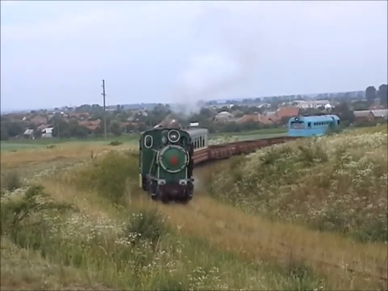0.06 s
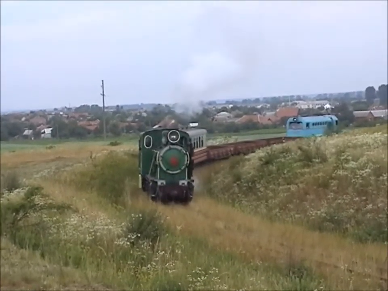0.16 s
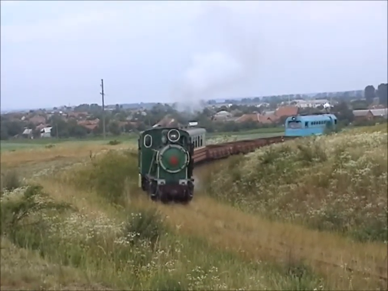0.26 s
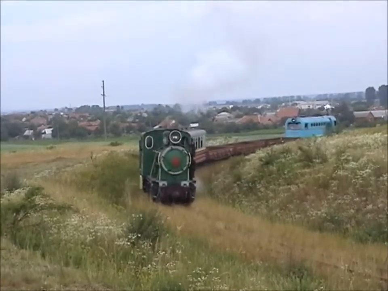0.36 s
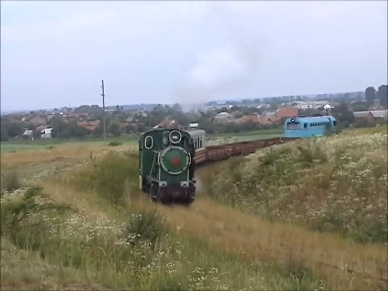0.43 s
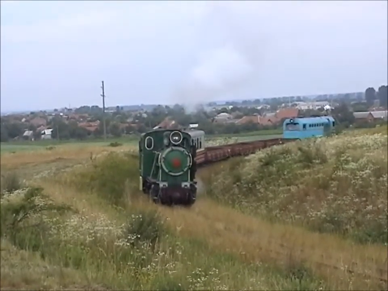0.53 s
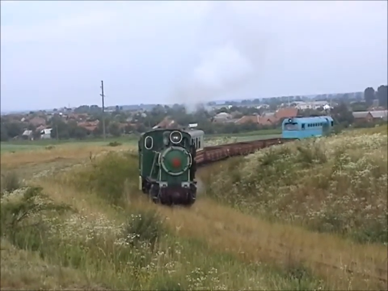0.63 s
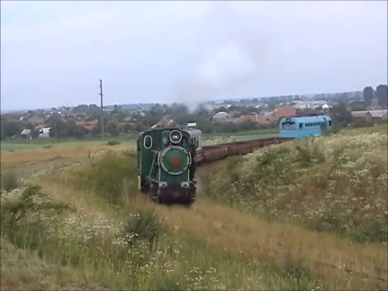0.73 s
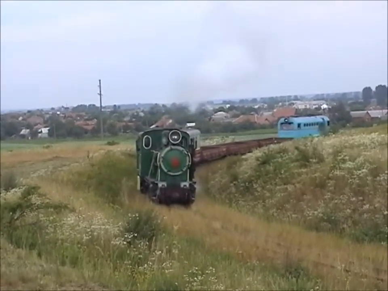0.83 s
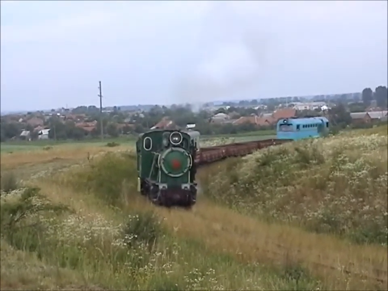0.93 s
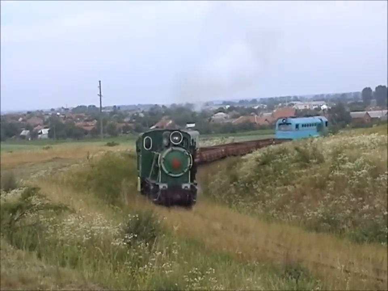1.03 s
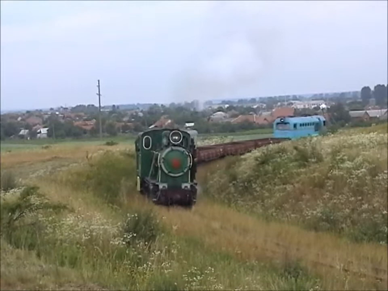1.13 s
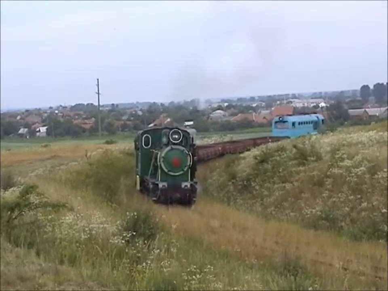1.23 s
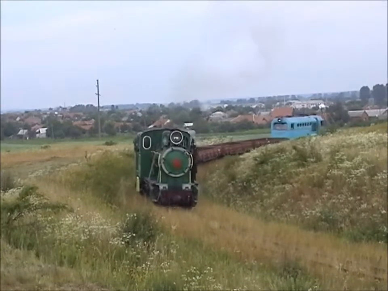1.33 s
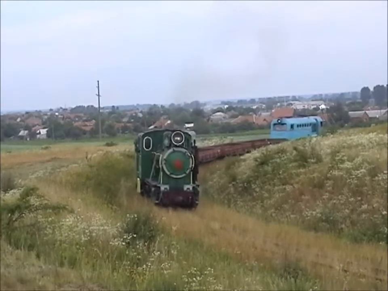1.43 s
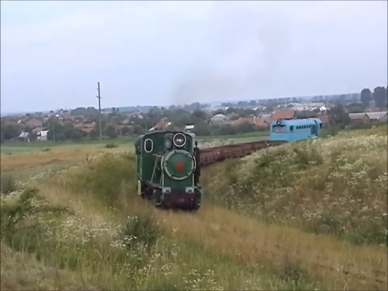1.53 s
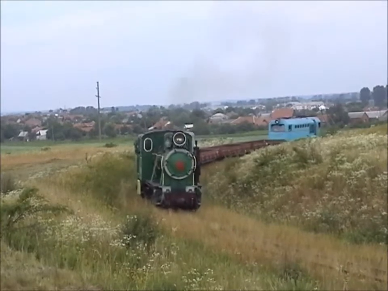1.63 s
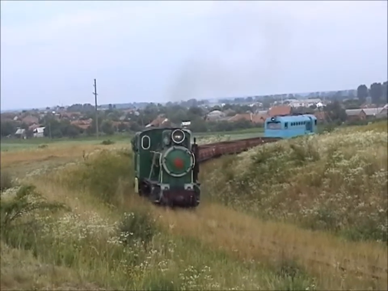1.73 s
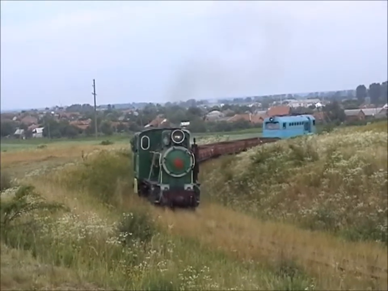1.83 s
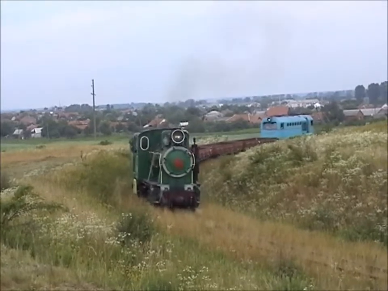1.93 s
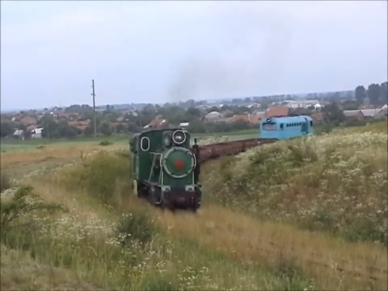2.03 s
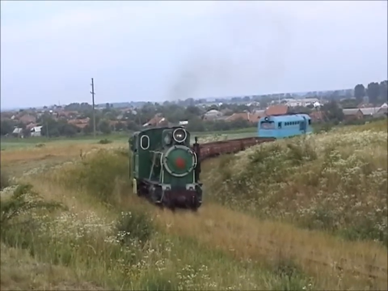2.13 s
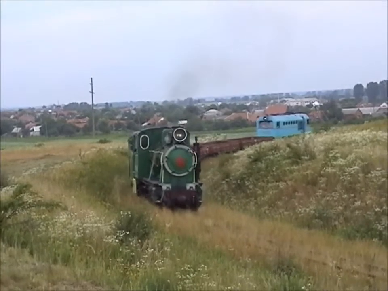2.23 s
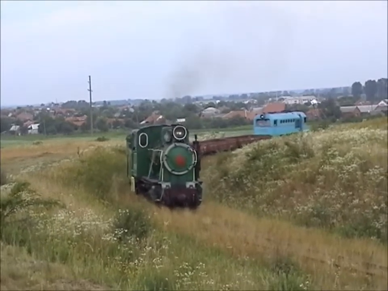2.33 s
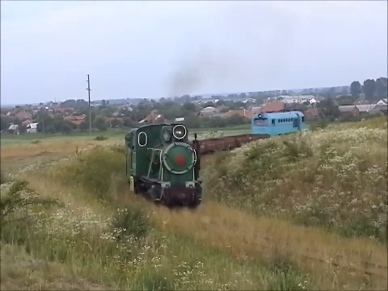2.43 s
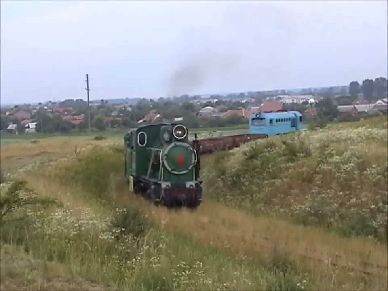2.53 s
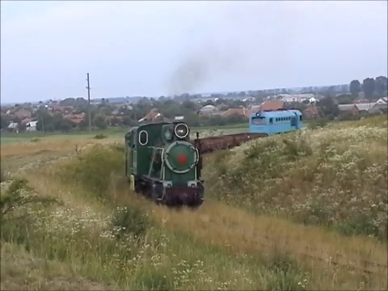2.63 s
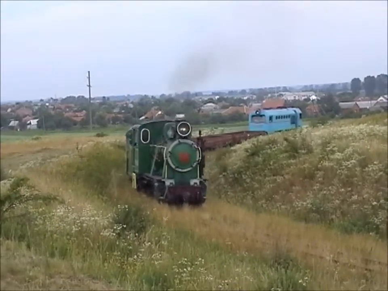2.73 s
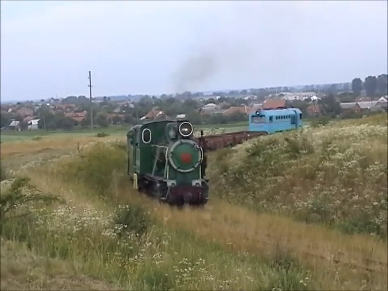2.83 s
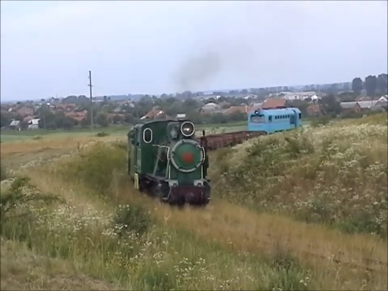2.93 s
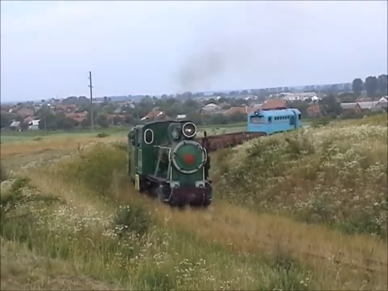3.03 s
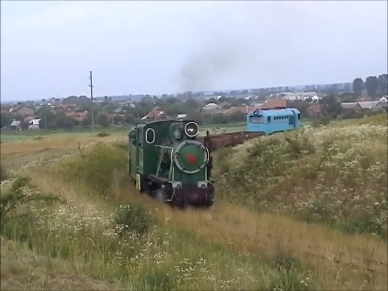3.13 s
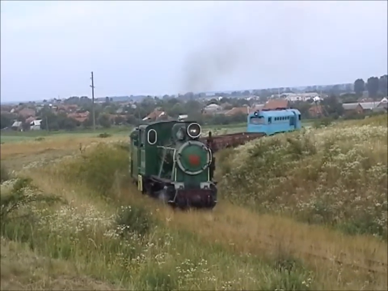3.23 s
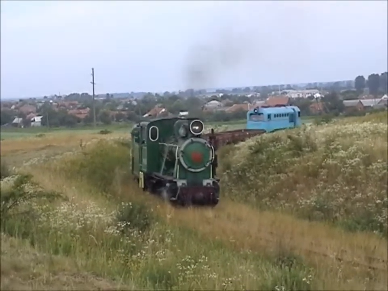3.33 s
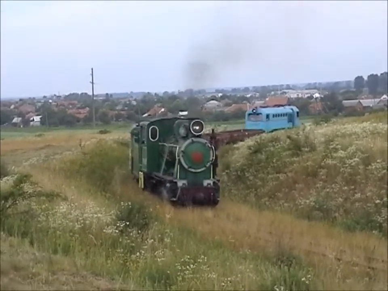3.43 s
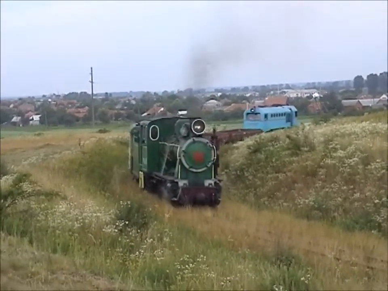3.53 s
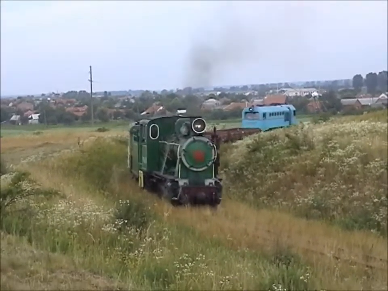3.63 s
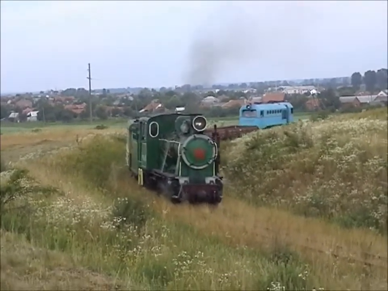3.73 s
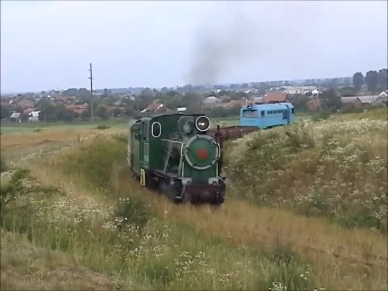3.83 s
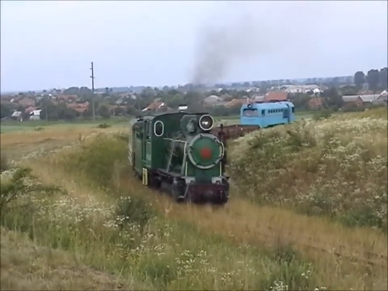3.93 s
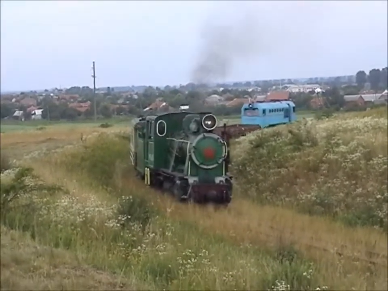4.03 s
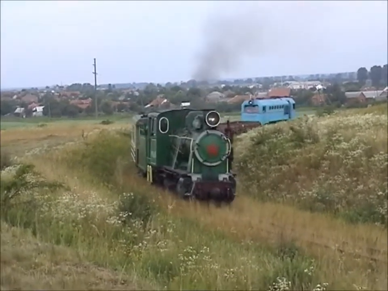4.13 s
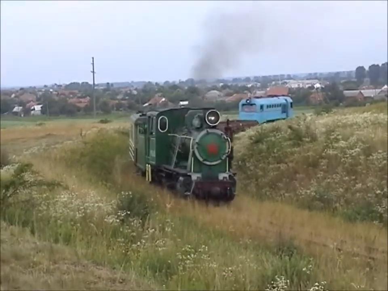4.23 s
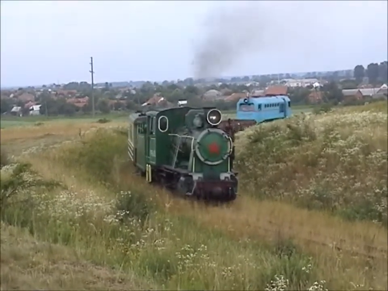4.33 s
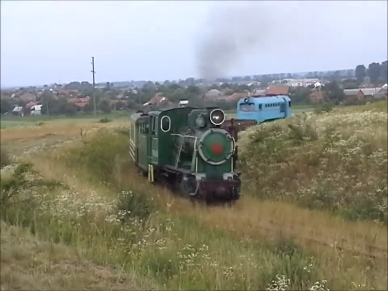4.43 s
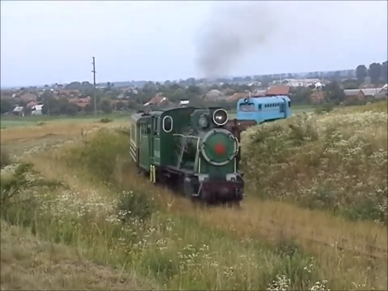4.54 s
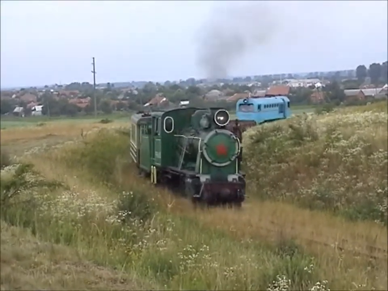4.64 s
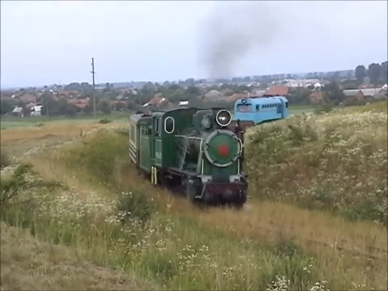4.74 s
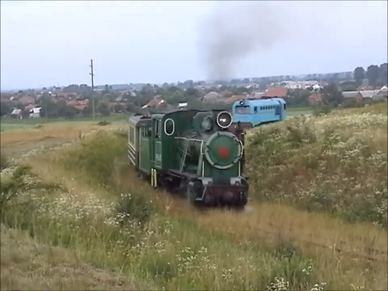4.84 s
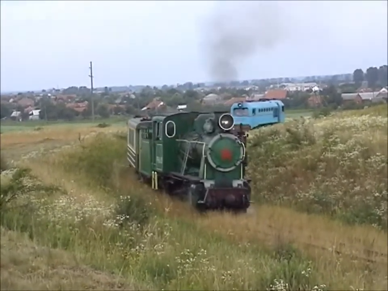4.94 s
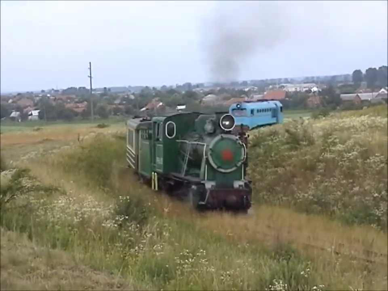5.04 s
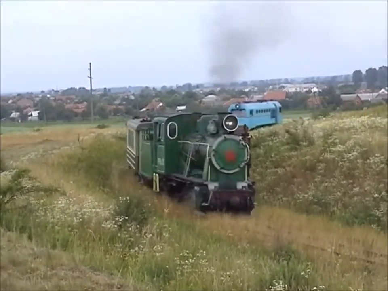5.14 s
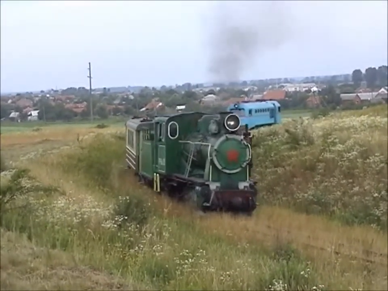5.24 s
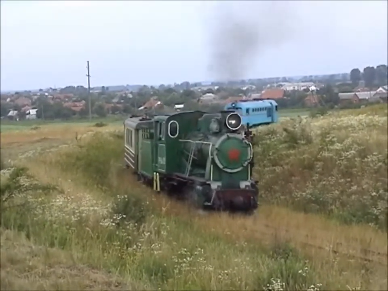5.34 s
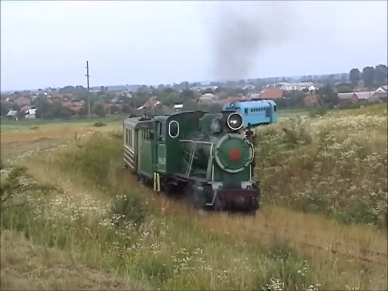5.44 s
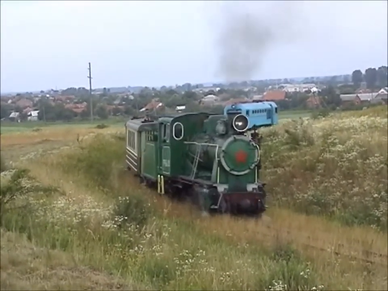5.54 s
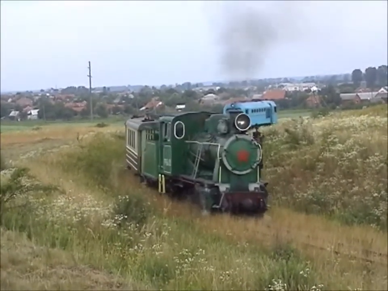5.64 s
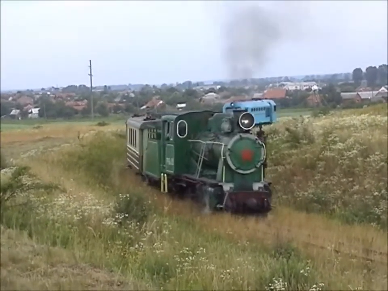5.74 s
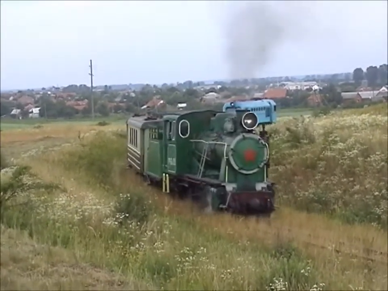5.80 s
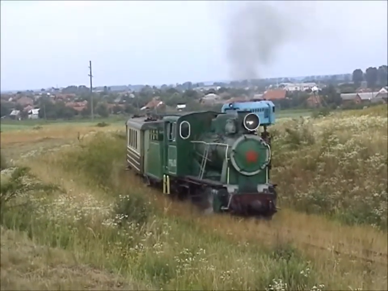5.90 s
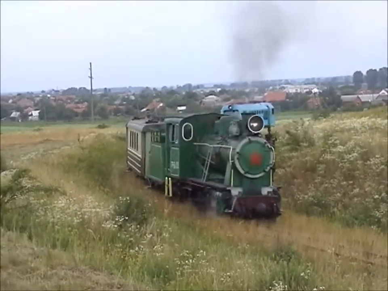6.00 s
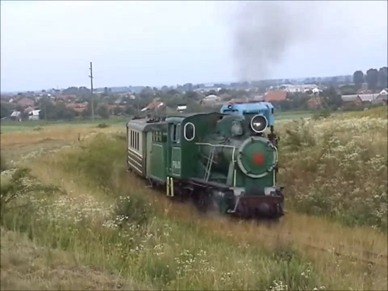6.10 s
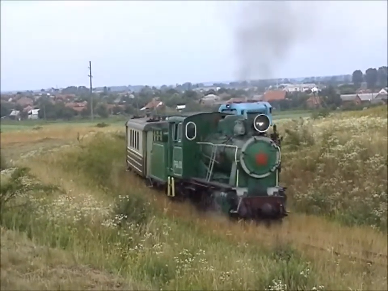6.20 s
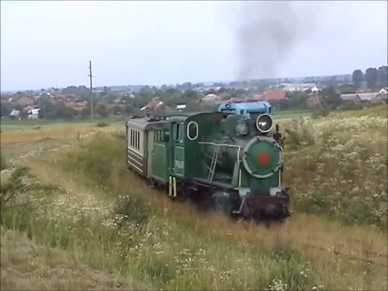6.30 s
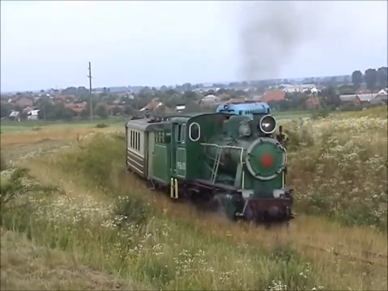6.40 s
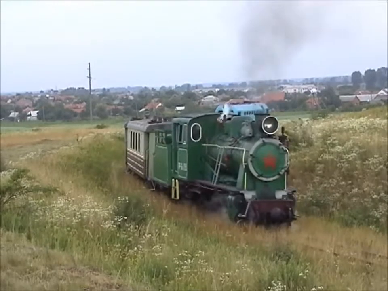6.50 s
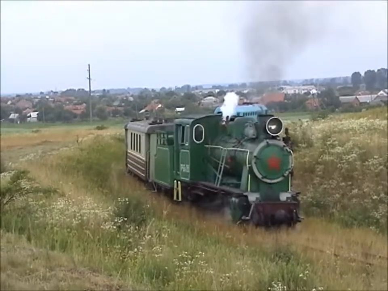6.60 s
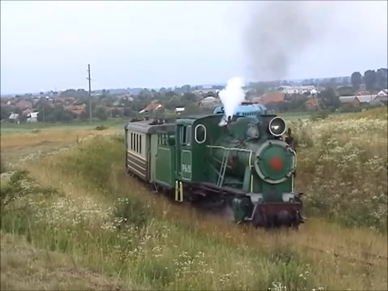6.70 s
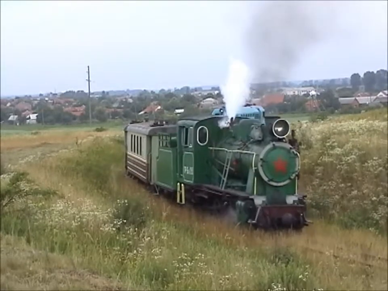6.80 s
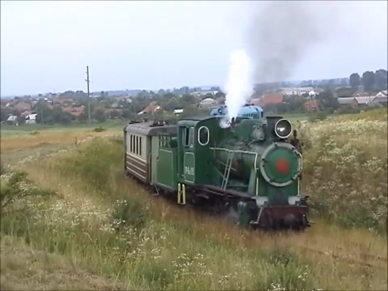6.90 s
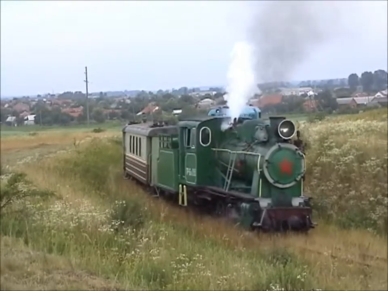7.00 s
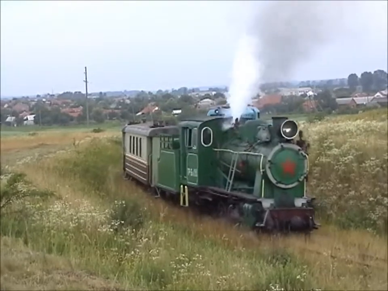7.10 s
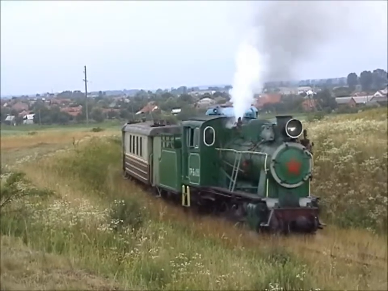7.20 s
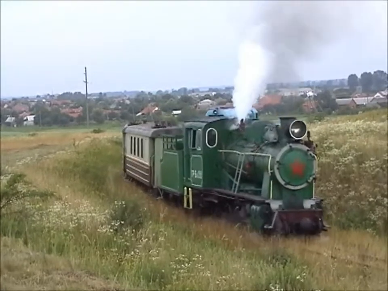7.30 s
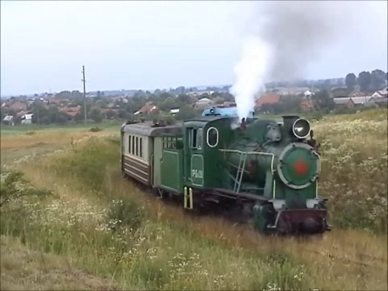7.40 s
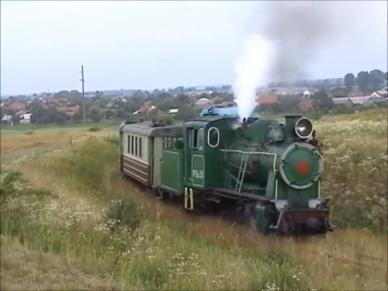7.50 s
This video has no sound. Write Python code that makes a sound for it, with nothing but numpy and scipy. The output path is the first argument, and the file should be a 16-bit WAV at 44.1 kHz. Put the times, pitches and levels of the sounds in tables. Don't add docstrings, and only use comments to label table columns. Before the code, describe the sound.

Outdoors in an open grassy field, a small steam engine slowly approaches. Bright cylinder hisses swell and snap off about once every 0.9 seconds, answered by hollower, ringing hisses. Soft low chuffs thud about four or five a second over a quiet rumble of wheels and wagons. Near the end a whistle bursts in with a wet sputter, slides upward and holds loudly, pushing the rest down. Handheld stereo microphone at some distance.

```python
import sys
import numpy as np
from scipy import signal
from scipy.fft import rfft, irfft, next_fast_len
from scipy.io import wavfile
from scipy.ndimage import uniform_filter1d, map_coordinates

SR = 44100
rng = np.random.default_rng(int(sys.argv[2]) if len(sys.argv) > 2 else 0)


def log_audio(samples):
    frames = np.atleast_2d(samples).T
    limited = np.clip(frames, -1, 1)
    pcm = np.round(limited * 32767).astype(np.int16)
    wavfile.write(sys.argv[1], SR, pcm)


def level_to_linear(level):
    exponent = np.asarray(level, float) / 20
    return 10 ** exponent


N = 333396
T = np.arange(N) / SR
M = 2 * next_fast_len(N // 2 + 2048, real=True)
F = np.maximum(np.arange(M // 2 + 1) * SR / M, 1)

# (frequency [Hz], width [Hz], level [dB])
WHISTLE_DIP = [(1430, 200, -24)]


def unit(x):
    return x / np.sqrt(np.mean(x ** 2))


def along(points):
    hz, value = np.transpose(points)
    return np.interp(np.log(F), np.log(hz), value)


def played(table, hold=False):
    s, *columns = np.transpose(table)
    gate = np.clip(np.minimum(T - s[0], s[-1] + hold - T) / 0.01 + 1, 0, 1)
    return [np.interp(T, s, c) for c in columns] + [gate]


def bumps(peaks):
    return level_to_linear(sum(db * np.exp(-2 * ((F - hz) / width) ** 2) for hz, width, db in peaks))


def resonances(peaks, steep=2):
    power = sum(level_to_linear(2 * db) / (1 + ((F - hz * hz / F) / width) ** 2) ** steep for hz, width, db in peaks)
    return np.sqrt(power)


def shaped(x, gain):
    return irfft(rfft(x, M) * gain, M)[..., :N]


def walk(rate):
    k = max(int(SR / rate), 1)
    steps = np.repeat(rng.standard_normal(N // 8 + 1)[:N // k + 1], k)
    return unit(uniform_filter1d(uniform_filter1d(steps, k), k)[:N])


def turbulence(gain, sputter_db, flicker_db, flicker_rate, count=3):
    jet = shaped(rng.standard_normal(N) * level_to_linear(sputter_db * walk(700)), gain)
    hz, s, cells = signal.stft(jet, SR, nperseg=512)
    band = count * np.log2(np.maximum(hz, 32) / 32)
    place = np.meshgrid(band, s * flicker_rate, indexing="ij")
    flutter = map_coordinates(rng.standard_normal((10 * count, 400)), place, order=1)
    cells = cells * level_to_linear(1.5 * flicker_db * flutter)
    return unit(signal.istft(cells, SR, nperseg=512)[1][:N])


def strokes():
    # (opens [s], rise [s], peak [dB], snaps shut [s], seep after it [dB])
    thin_jets = [
        (-0.38, 0.05, -18, 0.3, -42.5),
        (0.52, 0.14, -18, 1.2, -40.5),
        (1.42, 0.17, -18, 2.116, -40.5),
        (2.31, 0.18, -16, 3.094, -39.5),
        (3.22, 0.2, -16, 3.886, -38.5),
        (4.119, 0.13, -15.5, 4.785, -37),
        (4.986, 0.1, -14.5, 5.64, -35.5),
        (5.861, 0.1, -15.5, 6.49, -31.5),
    ]
    # (opens [s], peak [dB], shuts [s], second resonance [dB], pressure taken from the thin jet [dB])
    hollow_jets = [
        (-0.06, -19, 0.15, -4, -4),
        (0.8, -18, 1.06, -4.5, 1),
        (1.69, -19.5, 2.013, -0.5, -2.5),
        (2.62, -18, 2.9, 0, -6),
        (3.51, -17, 3.81, -2, -3.5),
        (4.4, -18.5, 4.727, -4, -0.5),
        (5.28, -18.5, 5.64, -7, -1.5),
        (6.15, -16.5, 6.46, -6, 0.5),
    ]
    burst_share, burst_db = 0.44, -5.5
    settle_s, settle_db, sag_db_per_s = 0.11, -2.5, 13.5
    taper_s, taper_db = 0.096, -4.5
    close_s, creep_db = 0.03, 5
    steal_s = 0.073
    brighten_s, dull_lag_s, dull_s = 0.017, 0.028, 0.091
    seep_bright = 0.45
    late_bright, bright_per_db = 0.22, 0.08
    hollow_rise_s, hollow_sag_db, hollow_close_s, hollow_shut_db = 0.066, -1.5, 0.19, -20.5

    thin, bright, hollow, seep = [], [], [], -40
    for (s, rise, db, shut, rest), (back, peak, end, second, taken) in zip(thin_jets, hollow_jets):
        top = s + rise
        stolen = back + steal_s
        dulls = back + dull_lag_s

        def sagged(t):
            return t, db + settle_db - sag_db_per_s * (t - top - settle_s) + taken * (t > stolen)

        thin += [(s, seep + creep_db), (s + burst_share * rise, db + burst_db), (top, db),
                 (top + settle_s, db + settle_db), sagged(stolen), sagged(stolen + dull_s),
                 sagged(shut - taper_s), (shut, sagged(shut)[1] + taper_db), (shut + close_s, rest)]
        bright += [(s, seep_bright), (s + burst_share * rise, 0), (top + brighten_s, 1),
                   (dulls, 1), (dulls + dull_s, 0),
                   (shut, late_bright - bright_per_db * taken), (shut + close_s, seep_bright)]
        hollow += [(back, peak + hollow_shut_db, second), (back + hollow_rise_s, peak, second),
                   (end, peak + hollow_sag_db, second),
                   (end + hollow_close_s, peak + hollow_shut_db, second)]
        seep = rest
    return played(thin)[0], played(bright)[0], *played(hollow)[:2]


def leaks():
    # (frequency [Hz], level [dB per Hz])
    thin_colour = [(760, -42), (1300, -18.5), (2200, -6), (3500, -2.5), (5200, -1), (7400, 0), (8500, -5.5),
                   (10000, -7), (11500, -15.5), (12500, -20), (15700, -24)]
    # (frequency [Hz], width [Hz], boost [dB])
    drain_pipe = [(2250, 200, 2.5), (2770, 250, 3), (3150, 300, -4), (3850, 400, 2.5), (4220, 200, -4),
                  (4750, 300, -3), (5200, 400, 3), (5700, 250, -2.5), (6050, 300, 2.5), (6500, 300, -4),
                  (7550, 300, 3), (8170, 450, -6), (8900, 450, 5), (9550, 450, -4), (10050, 400, 3),
                  (10750, 350, -4), (11200, 350, 3.5)]
    # (frequency [Hz], width [Hz], level [dB])
    hollow_low = [(1297, 210, -13.5), (1717, 98, 2), (1907, 380, 0.5), (2228, 126, 2.5)]
    hollow_high = [(3586, 440, 1), (4185, 470, 1.5), (6300, 1500, -7)]
    dull_top_db, bright_top_db, dull_body_db, bright_body_db = -12, -8, 2.5, -0.5
    nearing_db_per_s = 0.5
    drown_s = 6.62

    thin_db, bright, hollow_db, second_db = strokes()
    hollow_db = uniform_filter1d(hollow_db, int(0.07 * SR))
    top_db = dull_top_db + (bright_top_db - dull_top_db) * bright
    body_db = dull_body_db + (bright_body_db - dull_body_db) * bright
    body_db = body_db + nearing_db_per_s * (T - T.mean())

    jet = turbulence(level_to_linear(along(thin_colour)) * bumps(drain_pipe) ** 0.16,
                     sputter_db=0.5, flicker_db=1.9, flicker_rate=9, count=8)
    blast = np.clip((thin_db + top_db + 38) / 10, 0, 1)
    jet = jet + blast * (shaped(jet, bumps(drain_pipe) ** 0.7) - jet)

    above = 1 / (1 + (8200 / F) ** 14)
    below = 1 / (1 + (F / 4700) ** 16)
    early_db = 0.92 * np.clip(np.interp(T + 0.021, T, thin_db) - thin_db - 1.0, 0, 12)
    hiss = shaped(jet, 1 - above - below)
    body = level_to_linear(body_db - 0.5 + early_db) * shaped(jet, below)
    thin = level_to_linear(3.0) * (hiss + body) + level_to_linear(top_db) * unit(shaped(jet, above))

    low = turbulence(resonances(hollow_low), sputter_db=0.5, flicker_db=0.3, flicker_rate=18)
    high = turbulence(resonances(hollow_high), sputter_db=-2.5, flicker_db=0.4, flicker_rate=14)
    hollow = low + level_to_linear(second_db) * high
    drown = np.clip((drown_s - T) / 0.024, 0, 1)
    return drown * (level_to_linear(thin_db) * thin + level_to_linear(hollow_db - 3.0) * hollow)


def roll():
    # (time [s], level [dB])
    roll_levels = [
        (0.03, -45),
        (1.3, -41.5),
        (2.4, -40.5),
        (3.6, -42.5),
        (4.8, -42),
        (5.5, -43),
        (6.46, -42),
        (6.69, -47),
        (6.79, -55),
    ]
    # (frequency [Hz], level [dB per Hz])
    roll_colour = [(15, -51), (25, -35), (80, -2.5), (144, -6.5), (200, -1.5), (289, -8), (461, -5),
                   (571, -15.5), (667, -4.5), (779, -3), (1080, -1.5), (1370, -9), (1700, -1.5),
                   (2230, -9.5), (2600, -7), (3380, -12), (5720, -120)]
    db, _ = played(roll_levels)
    deep_db = 0.4 + 0.8 * np.minimum(db - roll_levels[0][1], 0)
    bed = turbulence(level_to_linear(along(roll_colour)), sputter_db=0.15, flicker_db=1.5, flicker_rate=8)
    bed = np.where(T < 6.63, bed, shaped(bed, bumps(WHISTLE_DIP)))
    deep = shaped(bed, 1 / (1 + (F / 140) ** 6))
    return level_to_linear(db + 8.5) * (bed - deep + level_to_linear(deep_db) * deep)


def exhaust(rise_s=0.011, fall_s=0.045, width_hz=50):
    # (time [s], thud [dB], chimney pitch [Hz])
    beats = [(0.09, -31, 191), (0.331, -34, 216), (0.549, -28.5, 240.6), (0.774, -34.5, 221),
             (1.005, -35, 186.5), (1.24, -35, 240), (1.468, -26.5, 204.4), (1.684, -28, 201.5),
             (1.902, -34, 229.5), (2.121, -36.5, 232), (2.357, -25, 203), (2.571, -33.5, 190),
             (2.809, -30.5, 194.6), (3.051, -25, 186.5), (3.264, -28, 210), (3.475, -32, 236),
             (3.712, -29.5, 203), (3.929, -29, 234), (4.141, -28, 205), (4.388, -33.5, 204.5),
             (4.598, -34, 175), (4.82, -25, 201.5), (5.021, -24, 195), (5.237, -31, 215), (5.442, -30, 204),
             (5.689, -26, 185), (5.902, -21, 189), (6.119, -30.5, 220), (6.322, -21, 197),
             (6.552, -25.5, 234)]
    puff_levels = [-29, -28.5, -22.5, -29.5]
    # (frequency [Hz], width [Hz], level [dB])
    chimney = [(380, 240, -6), (763, 144, -1), (1066, 190, -0.5), (1222, 72, -5)]
    puff = turbulence(resonances(chimney), sputter_db=-1.5, flicker_db=1.4, flicker_rate=40)
    out, t = np.zeros(N), np.arange(SR // 4) / SR
    rushes = rng.standard_normal((len(beats), len(t)))
    for (s, db, hz), puff_db, rush in zip(beats, puff_levels * len(beats), rushes):
        swell = np.exp(-((t - 2 * rise_s) / np.where(t < 2 * rise_s, rise_s, fall_s)) ** 2)
        hum = rush * swell + 0.1 * np.sin(2 * np.pi * hz * t) * swell
        for width in (width_hz, 3 * width_hz):
            hum = signal.lfilter(*signal.iirpeak(hz, hz / width, fs=SR), hum)
        thud = level_to_linear(db) * hum / np.abs(hum).max()
        i = int((s - 0.022) * SR)
        out[i:i + len(t)] += thud + level_to_linear(puff_db - 7) * swell * puff[i:i + len(t)]
    return out


def blow():
    # (time [s], level [dB])
    spit_levels = [
        (6.532, -28),
        (6.548, -17),
        (6.574, -13.5),
        (6.614, -24),
        (6.64, -17.5),
        (6.684, -26.5),
        (6.76, -34),
    ]
    # (time [s], level [dB])
    steam_levels = [
        (6.72, -35),
        (6.8, -37),
        (6.88, -32),
        (6.97, -34),
        (7.09, -31.5),
        (7.17, -34.5),
        (7.25, -33),
        (7.5, -34.5),
    ]
    # (frequency [Hz], level [dB per Hz])
    steam_colour = [(350, -30), (600, -14), (900, 2.5), (1250, 1.5), (1750, -3), (3000, 0), (4200, -5),
                    (5300, -1), (6000, -5), (7000, -2.5), (8200, -8), (10500, -9), (11500, -17),
                    (15700, -26)]
    # (frequency [Hz], width [Hz], level [dB])
    spit_peaks = [(970, 120, 2.5), (1900, 120, -7), (2700, 190, 0), (3350, 230, -2), (3830, 200, -8),
                  (5120, 570, -2), (6500, 530, -7), (9000, 2200, -19)]
    db, _ = played(steam_levels, hold=True)
    spit_db, spit_gate = played(spit_levels)
    dip = bumps(WHISTLE_DIP)
    hiss = turbulence(level_to_linear(along(steam_colour)), sputter_db=0.5, flicker_db=-0.8, flicker_rate=13)
    hiss = shaped(hiss, dip)
    spit_gain = resonances(spit_peaks, steep=1) * dip / (1 + (F / 11500) ** 4)
    spit = turbulence(spit_gain, sputter_db=1.0, flicker_db=-1.5, flicker_rate=30)
    steam_on = T > spit_levels[1][0]
    return steam_on * level_to_linear(db + 5.0) * hiss + spit_gate * level_to_linear(spit_db - 0.5) * spit


def whistle(wobble=0.0009, flutter_db=0.4, skirt_db=-30):
    # (time [s], pitch [Hz], level [dB], overblown octave under the chime [dB])
    main_chime = [
        (6.56, 865, -36, -10),
        (6.574, 836.4, -8.5, -34),
        (6.63, 834.6, -14.5, -30),
        (6.65, 835, -8, -24),
        (6.726, 877.4, -14, -26),
        (6.86, 893.7, -15.5, -18),
        (6.92, 903.6, -14.5, -19),
        (7.11, 913.3, -11, -16.5),
        (7.56, 923, -10.5, -13),
    ]
    # (multiple, under the chime at full blow [dB], breathiness [0-1])
    overtones = [(4, -31, .1), (5, -26, .1), (7, -26, .2)]
    # (pitch [Hz], level [dB], speaks steadily from [s])
    high_chime = (1193, -25.5, 6.866)
    # (frequency [Hz], width [Hz], level [dB])
    low_chime = (698, 48, -44.5)
    # (time [s], level [dB])
    stutters = [
        (6.712, -12),
        (6.74, -5),
        (6.768, -5),
        (6.792, 2),
        (6.828, 2),
    ]
    # (leaps [s], held back [dB], held for [s])
    octave_jump = (7.045, -4, 0.12)
    # (time [s], level [dB])
    pan_levels = [
        (7.14, -2.5),
        (7.28, 2),
    ]
    stutter_s = 0.005

    hz, db, octave_db, gate = played(main_chime, hold=True)
    leap_s, held_db, held_s = octave_jump
    held = np.interp(T, [leap_s - held_s, leap_s - 0.015, leap_s + 0.015], [0, 1, 0])
    second_db = db + (octave_db + held_db * held)
    third_db = -28.5 - 10 * np.clip((6.72 - T) / 0.024, 0, 1)
    third_db = third_db - 0.67 * np.maximum(second_db + 30, 0)

    phase = 2 * np.pi * np.cumsum(hz * (1 + wobble * walk(60))) / SR
    breath = 1 + level_to_linear(skirt_db) * walk(240)
    main = np.zeros(N)
    for k, level in [(1, db), (2, second_db), (3, third_db)]:
        main += level_to_linear(level + k * flutter_db * walk(35)) * np.sin(k * phase)
    overtones_in = np.clip((T - 6.62) / 0.25, 0, 1)
    for k, rel, breathy in overtones:
        level = level_to_linear(0.5 * db - 6 + rel + 2.5 * walk(12))
        main += overtones_in * level * (1 - breathy + breathy * walk(130)) * np.sin(k * phase)

    high_hz, high_db, steady_s = high_chime
    high_gate = np.clip((T - stutters[0][0]) / 0.024 + 1, 0, 1)
    speaks = np.clip((T - steady_s) / stutter_s + 0.5, 0.2, 1)
    speaks = speaks + sum(level_to_linear(rel) * np.exp(-((T - s) / stutter_s) ** 2) for s, rel in stutters)
    high_phase = 2 * np.pi * np.cumsum(high_hz * (1 + 0.00254 * walk(70))) / SR
    beat_tone = level_to_linear(-31.0) * np.sin(high_phase - phase)
    high = speaks * level_to_linear(high_db + 1.8 * walk(50)) * (np.sin(high_phase) + beat_tone)

    low = level_to_linear(low_chime[2]) * unit(shaped(rng.standard_normal(N), resonances([low_chime])))
    tone = np.sqrt(2) * (gate * breath * main + high_gate * high) + high_gate * low
    pan_db, _ = played(pan_levels)
    return shaped(tone, bumps(WHISTLE_DIP)) * level_to_linear(np.array([pan_db, -pan_db]) / 2)


def scene():
    # (frequency [Hz], width [Hz], level [dB])
    ground_dips = [(587, 39, -3.5), (1397, 47, -8.5)]
    # (frequency [Hz], phase [radians])
    port_levels = [(60, -0.5), (110, -2.0), (200, -2.4), (380, -1.2), (700, -1.2), (1290, 0.77),
                   (2380, 0.72), (4400, 0.14), (8120, 1.9), (11000, 0.95)]
    port_phases = [(0, 0), (1120, 0.27), (1380, -0.1), (1720, 0.6), (2240, -0.22), (4910, 0.38),
                   (6290, -0.031), (8350, 0.51), (9560, -0.97), (10300, 0.26), (11000, 0.0)]
    # (frequency [Hz], under the direct sound [dB])
    scatter_colour = [(60, -27), (600, -33), (1400, -15.5), (3000, -23.5), (6000, -39), (9000, -11),
                      (12000, -43)]
    noise = shaped(leaks() + exhaust() + roll() + blow(), bumps(ground_dips))
    t = np.arange(SR // 40) / SR
    scatter = unit(rng.standard_normal(len(t)) * np.exp(-t / 0.016)) / np.sqrt(len(t))
    unlike = shaped(signal.fftconvolve(noise, scatter)[:N], level_to_linear(along(scatter_colour)))
    lead = level_to_linear(along(port_levels) / 2) * np.exp(0.5j * along(port_phases))
    ports = np.array([shaped(noise, lead) + unlike, shaped(noise, 1 / lead) - unlike])
    return ports + whistle()


def roll_off(x):
    return signal.sosfilt(signal.butter(12, 15870, fs=SR, output="sos"), x)


def record(dry):
    mix = np.tanh(0.6 * dry) / 0.6
    return roll_off(mix)


dry = scene()
out = record(dry)
log_audio(out)
```